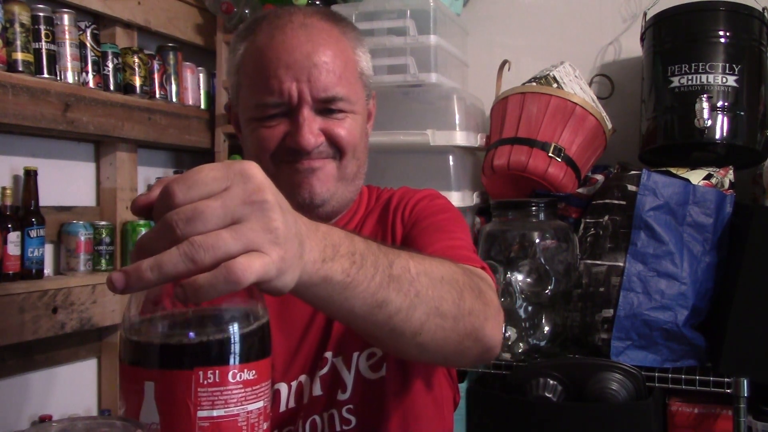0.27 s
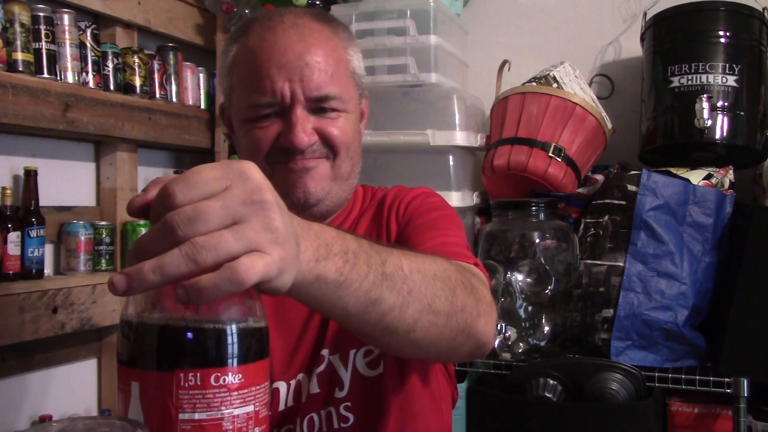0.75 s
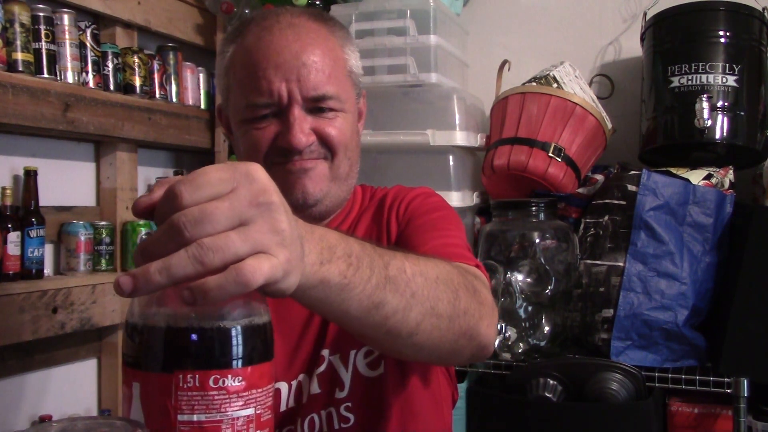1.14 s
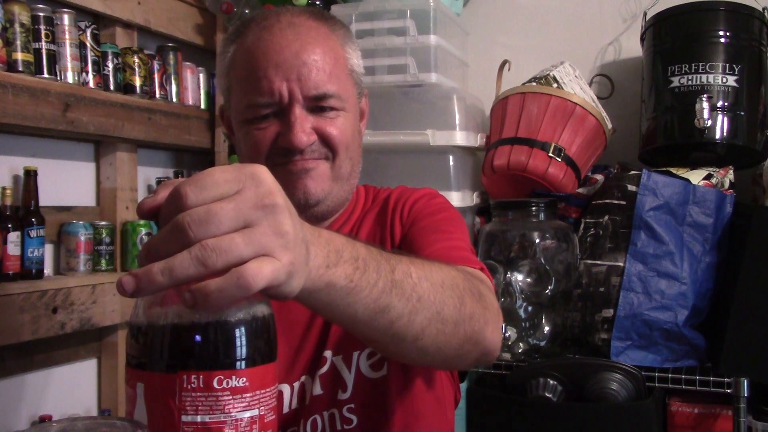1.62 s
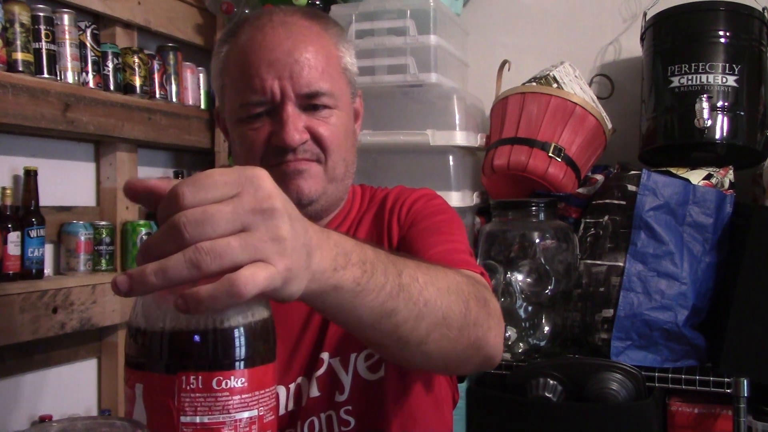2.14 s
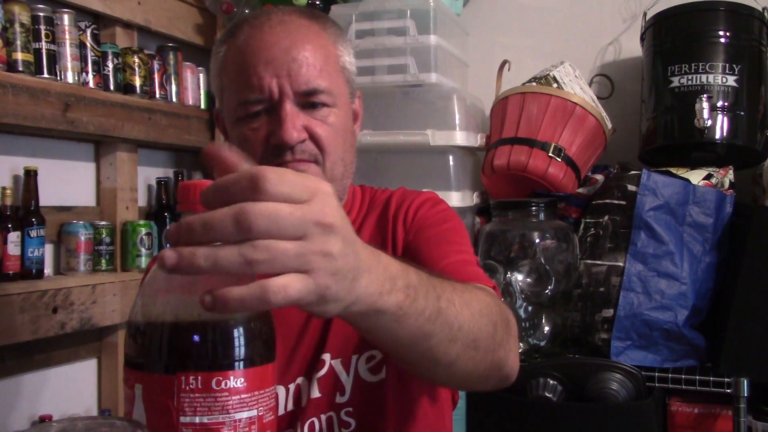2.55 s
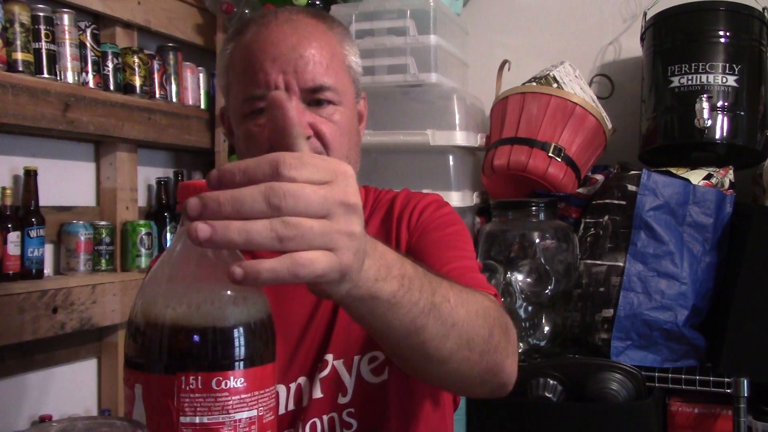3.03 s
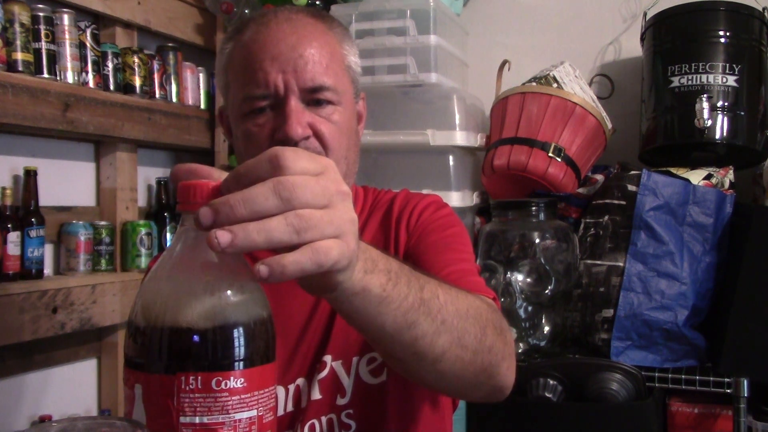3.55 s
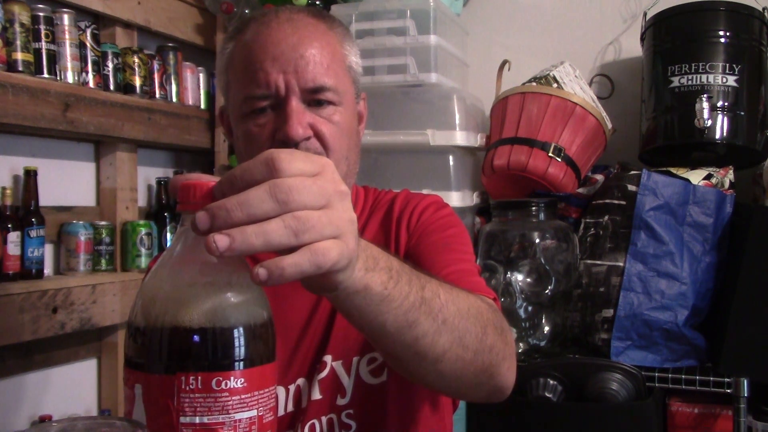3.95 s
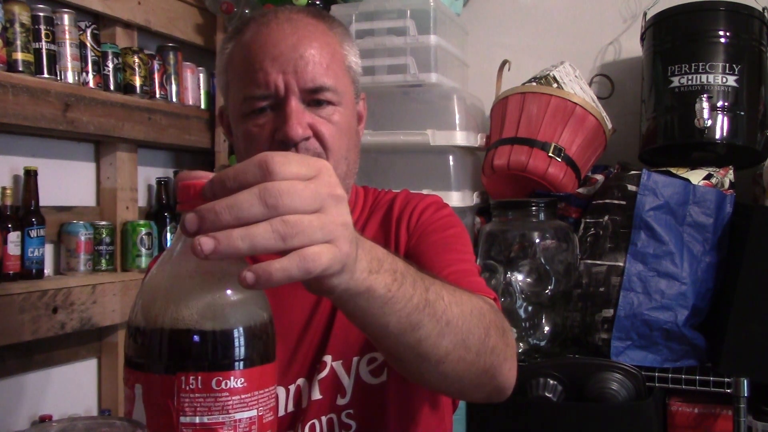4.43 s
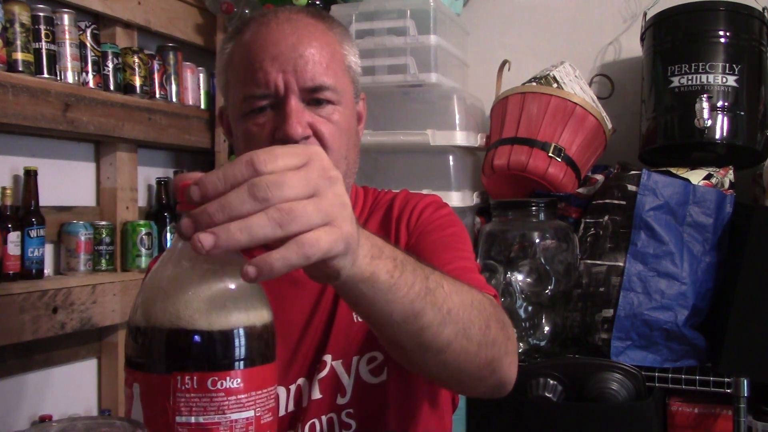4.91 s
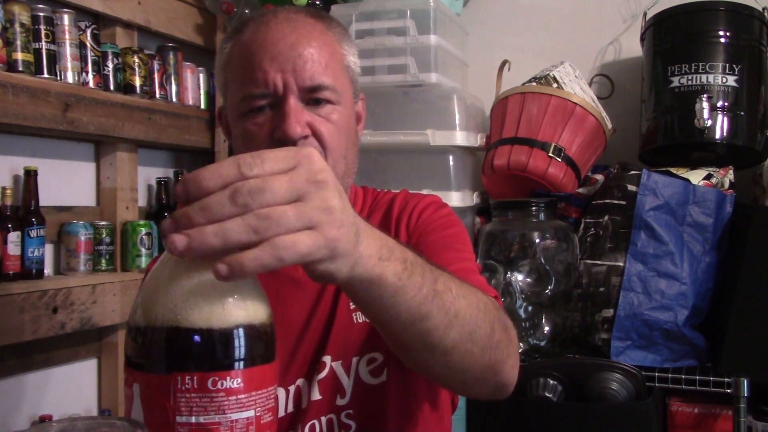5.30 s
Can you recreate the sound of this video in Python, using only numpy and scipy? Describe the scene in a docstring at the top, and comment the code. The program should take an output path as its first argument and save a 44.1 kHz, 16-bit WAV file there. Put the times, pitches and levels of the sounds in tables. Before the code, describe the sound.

Gas hisses through the screw cap of a shaken plastic soda bottle from the start, heard close up in a small, quiet room. The bright, slightly whistling jet swells, is loudest with a slight roar around 0.8 seconds, then dulls and dies away by 1.8 seconds. Fingers rub faintly on the cap, which ticks twice near 1.9 seconds. At about 2.2 seconds a small spurt begins a much quieter, wet fizz as foam reaches the cap, with a faint flex of plastic near 2.7 seconds. From 3 seconds the fizz crackles with tiny bubble pops and a thin, high whistling edge, then weakens to a trace by 4.5 seconds. Around 5.1 seconds the cap clicks and the bottle wall gives a soft snap and thud. A last short spurt of gas escapes at 5.3 to 5.4 seconds, followed by a faint, dull rustle of arm movement.

```python
"""Gas jets through the thread of a shaken plastic soda bottle as its screw cap is eased open.
The jet sounds the hollow under the hand; as the pressure falls, foam rises and the leak thins to a
wet fizz. Bubbles pop, the cap ticks, the wall flexes, and a last spurt escapes as the grip shifts.
Heard close up in a small store room."""
import sys
import numpy as np
from scipy import signal
from scipy.fft import rfft, irfft
from scipy.io import wavfile

SR = 44100
rng = np.random.default_rng(int(sys.argv[2]) if len(sys.argv) > 2 else 0)


def waveform_to_disk(signal):
    """Save audio, clipped to [-1, 1], as 16-bit WAV at the path in sys.argv[1]."""
    frames = np.transpose(np.atleast_2d(signal))
    scaled = np.clip(frames, -1, 1) * 32767
    samples = np.round(scaled).astype(np.int16)
    wavfile.write(sys.argv[1], SR, samples)


N = 245548
TIME = np.arange(N) / SR
HZ = np.maximum(np.fft.rfftfreq(N, 1 / SR), 1)
CUTOFF_HZ = 15900


def from_db(db):
    """Decibels to gain."""
    return 10 ** (np.asarray(db) / 20)


def unit_rms(x):
    """Scale to unit rms."""
    return x / np.sqrt(np.mean(x ** 2) + 1e-20)


def ramp(start_s, length_s):
    """Linear rise from 0 to 1."""
    return np.clip((TIME - start_s) / length_s, 0, 1)


def during(curve, fade_s):
    """Gate: 1 within a curve's span, exponential fade outside."""
    outside_s = np.maximum(curve[0][0] - TIME, TIME - curve[-1][0])
    return np.exp(-np.maximum(0, outside_s) / fade_s)


def colour(points):
    """Gain per frequency, interpolated in dB over log f."""
    hz, db = np.transpose(points)
    return from_db(np.interp(np.log(HZ), np.log(hz), db))


def resonances(modes):
    """Gain per frequency of steep-sided peaks, summed in power."""
    peaks = (from_db(db) / (1 + ((HZ - hz) / width) ** 2) ** 2 for hz, width, db in modes)
    return np.sqrt(sum(peak ** 2 for peak in peaks))


def through(x, gain):
    """Filter by a gain per frequency."""
    return irfft(rfft(x) * gain, N)


def bandpass(x, low_hz, high_hz):
    """Butterworth band-pass."""
    return signal.sosfilt(signal.butter(2, [low_hz, high_hz], "band", fs=SR, output="sos"), x)


def treble(x, gain_db, split_hz):
    """High shelf."""
    top = through(x, 1 / (1 + (split_hz / HZ) ** 10))
    return x + top * (from_db(gain_db) - 1)


def noise(gain):
    """Coloured noise, unit rms."""
    return unit_rms(through(rng.standard_normal(N), gain))


def flutter(rate_hz, depth_db):
    """Randomly wavering gain."""
    return from_db(depth_db * noise(1 / (1 + (HZ / rate_hz) ** 2)))


def grains(gain, per_s, spread_db=0):
    """Coloured random impulses, unit rms."""
    sizes = from_db(spread_db * np.minimum(rng.exponential(1, N), 4))
    signs = rng.choice([-1, 1], N)
    hits = rng.random(N) < per_s / SR
    return unit_rms(through(sizes * signs * hits, gain))


def rustle(gestures, spectrum, per_s, rough_db):
    """Rough grains that swell and fade with each gesture."""
    swells = (from_db(db - 20 * np.maximum((s - TIME) / rise_s, (TIME - s) / fall_s))
              for s, db, rise_s, fall_s in gestures)
    envelope = np.sqrt(sum(swell ** 2 for swell in swells))
    return envelope * grains(colour(spectrum), per_s) * flutter(rate_hz=110, depth_db=rough_db)


def place(x, start_s):
    """Put a sound on the timeline."""
    return np.pad(x, (int(start_s * SR), N))[:N]


def ring(start_s, db, hz, t60_s, glide_per_s=0):
    """Damped sine with a linear pitch glide."""
    age = np.arange(SR // 8) / SR
    phase = 2 * np.pi * hz * age * (1 + glide_per_s * age / 2)
    return place(from_db(db - 60 * age / t60_s) * np.sin(phase), start_s)


def diffuse(x, t60_s=0.08):
    """Convolve with decaying noise, unit gain."""
    age = np.arange(SR // 3) / SR
    response = rng.standard_normal(len(age)) * from_db(-60 * age / t60_s) * (age > .003)
    return signal.fftconvolve(x, response / np.linalg.norm(response))[:N]


# room noise spectrum: f/Hz, relative level/dB
ROOM_SPECTRUM = [(25, -31.5), (60, -7.5), (110, -5), (160, 2), (280, 2), (450, -2), (700, -6), (1000, -2),
                 (1150, -9.5), (1320, -1), (1600, -7.5), (3000, -14), (8000, -19.5), (15800, -37.5)]
# its stereo width: f/Hz, side re mid/dB
ROOM_SIDE = [(60, -3.5), (250, -6), (600, -4.5), (1200, -12.5), (8000, -11)]

def room_noise(level_db=-56.5):
    """Low steady noise of the room, as mid and side."""
    mid = noise(colour(ROOM_SPECTRUM))
    side = through(noise(colour(ROOM_SPECTRUM)), colour(ROOM_SIDE))
    return from_db(level_db) * np.array([mid, side])


# early reflections: delay/s, gain
ECHOES = [(.00102, .07), (.001406, .08), (.003855, -.07), (.004807, .04), (.00551, .06)]

def reflections(x, tail_db=-10):
    """Early returns off hand, bottle and shelves, plus a dense room tail."""
    early = sum(gain * np.interp(TIME - delay_s, TIME, x, left=0) for delay_s, gain in ECHOES)
    return early + from_db(tail_db) * diffuse(x)


# faint decorrelated side signal, mostly treble: f/Hz, side gain/dB
SIDE_SPECTRUM = [(1200, -44.5), (2800, -60), (3900, -17), (8000, -18), (12000, -15), (15000, -22.5)]

def stereo_width(x):
    """A faint decorrelated side signal, mostly in the treble."""
    return through(diffuse(x), colour(SIDE_SPECTRUM))


# arm movement: peak t/s, level/dB, 20 dB rise/s, 20 dB fall/s
ARM_MOVES = [(5.525, -56.5, 0.12, 0.092)]
# its spectrum: f/Hz, relative level/dB
ARM_SPECTRUM = [(40, -33.5), (120, -8), (450, 7.5), (850, 2), (1500, -11), (3000, -28), (14000, -36)]

def arm_shift():
    """The arm shifts with a dull rustle."""
    return rustle(ARM_MOVES, ARM_SPECTRUM, per_s=2500, rough_db=3.5)


# rubs on the cap: peak t/s, level/dB, 20 dB rise/s, 20 dB fall/s
RUBS = [(1.57, -48.5, .3, 0.44), (2.29, -56, 0.19, .3), (2.45, -53.5, .15, 0.23),
        (2.675, -47.5, 0.083, 0.076)]
# their spectrum: f/Hz, relative level/dB
RUB_SPECTRUM = [(600, -20), (850, -2), (1300, -2.5), (1550, -7.5), (2100, -3), (2800, -12), (5000, -14),
                (14000, -33)]

def cap_rubs():
    """Gas and fingers brush over the cap."""
    return rustle(RUBS, RUB_SPECTRUM, per_s=1900, rough_db=2.5)


# wall flexes, levels before filtering: t/s, snap/dB, thud/dB, thud f/Hz
FLEXES = [(2.201, -57.5, -40.5, 275), (2.667, -47, -62, 300), (5.2122, -38, -46, 196)]
# wall modes: f/Hz, level re snap/dB, t60/s
WALL_MODES = [(1100, -5, .022), (1360, -7, 0.017), (1990, 7.5, 0.0053), (2390, -3, 0.0078),
              (3240, -5, 0.011)]

def wall_flexes(thud_t60_s=0.073, thud_delay_s=0.0042):
    """The wall snaps under the fingers, then the full bottle thuds; a small body radiates little bass."""
    snaps = sum(ring(s, snap_db + db, hz, t60_s)
                for s, snap_db, _, _ in FLEXES for hz, db, t60_s in WALL_MODES)
    thuds = sum(ring(s + thud_delay_s, db, hz, thud_t60_s) for s, _, db, hz in FLEXES)
    return bandpass(snaps, 700, 4500) + bandpass(thuds, 130, 500)


# plastic ticks: t/s, peak level/dB, nominal band centre f/Hz
TICKS = [(1.8808, -28, 8500), (1.9192, -32, 14500), (5.108, -34.5, 5500), (5.111, -36, 7000),
         (5.1192, -34, 12000)]

def cap_ticks(crack_t60_s=.003, tail_db=-19, tail_t60_s=0.1):
    """The cap slips on its thread: a sharp crack and a short bright tail."""
    out = np.zeros(N)
    age = np.arange(SR // 10) / SR
    envelope = from_db(-60 * age / crack_t60_s) + from_db(tail_db - 60 * age / tail_t60_s)
    for s, db, hz in TICKS:
        burst = rng.standard_normal(len(age)) * envelope
        burst = bandpass(burst, hz / 2, min(hz * 1.5, CUTOFF_HZ))
        out += place(from_db(db) * burst / np.abs(burst).max(), s)
    return out


# largest bubbles: t/s, level before boost/dB
LARGE_POPS = [(3.3822, -46), (3.6431, -44), (3.7449, -50), (3.8247, -49), (4.0632, -49), (4.6433, -45),
              (4.8249, -51), (4.8628, -48), (5.0833, -44)]

def bubble_pops(neck_hz=2070, t60_s=0.012, glide_per_s=25, boost_db=2, small_count=46):
    """Bubbles ring in the neck, rising in pitch as they open; small ones burst at random."""
    out = sum(ring(s, db + boost_db, neck_hz, t60_s, glide_per_s) for s, db in LARGE_POPS)
    for _ in range(small_count):
        start_s = rng.uniform(2.9, 5.2)
        db = rng.uniform(-54, -48)
        octaves = rng.uniform(-.33, .27)
        out += ring(start_s, db, neck_hz * 2 ** octaves, t60_s, glide_per_s)
    return out


# spurts: peak t/s, level/dB, 20 dB rise/s, 20 dB fall/s
SPURTS = [(2.31, -47, .2, 0.36), (5.29, -48, 0.039, 0.095), (5.39, -45.5, 0.16, 0.069)]
# their spectrum: f/Hz, relative level/dB
SPURT_SPECTRUM = [(300, -25), (2000, -11), (3500, -14.5), (3900, -1), (4600, -4), (5200, 1.5), (6100, -9),
                  (8500, -19), (10500, -17), (15000, -40)]

def gas_spurts():
    """Gas spurts through the wet thread as the grip shifts."""
    return rustle(SPURTS, SPURT_SPECTRUM, per_s=6600, rough_db=2.5)


# leak through the wet thread: t/s, level/dB
LEAK_LEVEL = [(2.22, -46), (2.35, -45), (3.0, -44), (3.5, -45), (4.3, -50.5), (4.52, -56.3), (5.12, -57.5)]
# wet gap resonances: f/Hz, width/Hz, relative level/dB
GAP_MODES = [(5100, 800, 0.5), (6150, 340, -5), (7520, 480, -2), (8040, 470, 0)]
# narrow gaps whistling in turn: peak t/s, spread/s, f/Hz, width/Hz, level re leak/dB
WHISTLES = [(3.1, .65, 12450, 900, -11.5), (3.95, 0.56, 9520, 805, -5.5)]
# spray of tiny bursting films: f/Hz, relative level/dB
SPRAY_SPECTRUM = [(1500, -22.5), (3100, -6), (4200, -0.5), (5700, 1.5), (6700, 2), (7400, 3.5),
                  (8700, -0.5), (9400, 0.5), (10800, 0), (11500, 0.5), (12450, -4), (13600, -9.5),
                  (15800, -15)]

def foam_fizz(spray_db=-3, spray_loss_db=8, brush_db=-17):
    """Foam fills the thread: the leak crackles, sings in the wet gaps and whistles in the narrowest."""
    leak_db = np.interp(TIME, *np.transpose(LEAK_LEVEL))
    wet = ramp(start_s=2.21, length_s=0.39)
    gaps_db = -16 * (1 - wet) - 3.2 * wet
    gas = from_db(gaps_db) * noise(resonances(GAP_MODES))
    whistle_power = 0
    for peak_s, spread_s, hz, width_hz, db in WHISTLES:
        gain = from_db(db) * np.exp(-((TIME - peak_s) / spread_s) ** 2 / 2)
        gas += gain * noise(resonances([(hz, width_hz, 0)]))
        whistle_power += gain ** 2
    bright_db = -6 * (1 - wet) + 3 * wet + 0.3 * (leak_db - leak_db.max())
    spray = grains(colour(SPRAY_SPECTRUM), per_s=14000, spread_db=0.5)
    spray = treble(spray, bright_db, split_hz=11000)
    gas += from_db(spray_db - spray_loss_db * whistle_power) * spray
    gas += from_db(brush_db) * noise(colour(RUB_SPECTRUM))   # the leak brushes the cap
    gas *= flutter(rate_hz=36, depth_db=0.57)
    return from_db(leak_db) * gas * during(LEAK_LEVEL, fade_s=0.079)


# hollow before the hand closes in: f/Hz, width/Hz, relative level/dB
HOLLOW_MODES = [(2049, 260, 1.5), (2188, 190, 1.5)]

def hand_hollow(pitch_drop=.033):
    """The hollow under the hand resonates, dropping in pitch as the hand cups the cap more closely."""
    cupped = ramp(start_s=1.35, length_s=.2)
    slowed_s = np.cumsum(1 - pitch_drop * cupped) / SR
    hollow = np.interp(slowed_s, TIME, noise(resonances(HOLLOW_MODES)))
    return hollow * flutter(rate_hz=7.3, depth_db=.5)


# flow through the dry thread: t/s, relative level/dB
JET_FLOW = [(0, -28), (.09, -25), (.33, -21.5), (.52, -15), (.85, -14), (1.12, -17), (1.44, -22.5),
            (1.77, -39.5), (1.97, -47), (2.1, -47), (2.18, -43.5)]
# hiss spectrum: f/Hz, relative level/dB
HISS_SPECTRUM = [(1400, -43), (2100, -14), (2900, -12), (3450, -4.5), (3950, -2), (5500, -2.5),
                 (6200, -1.5), (7400, 0.5), (9300, -3), (11300, -2), (13000, -9), (14100, -7.5),
                 (15800, -15.5)]
# edge tones of the thread: f/Hz, width/Hz, relative level/dB
EDGE_TONES = [(3955, 80, -1), (4225, 50, -2), (4532, 45, -2), (4737, 60, -1), (4965, 55, 1), (5822, 70, .5),
              (6574, 40, 5.5), (6705, 50, 0), (6865, 55, 1.5), (7065, 45, 0), (7306, 45, -1), (7690, 80, 1),
              (8942, 40, 0), (9072, 45, 0), (9463, 50, -2), (10788, 90, -2), (13700, 90, -8),
              (14700, 150, -8)]
# roar spectrum: f/Hz, relative level/dB
ROAR_SPECTRUM = [(60, -37), (250, -7), (700, -6), (1020, 5.5), (1300, 3.5), (1700, 5.5), (2900, 4),
                 (4500, -35)]

def gas_jet(tones_db=-9, tight_body_db=-1.5, tight_roar_db=-8, dulling_db_per_s=3.5):
    """Gas tears through the thread; only a strong jet roars, and it dulls as flow and pressure fall."""
    flow_db = np.interp(TIME, *np.transpose(JET_FLOW))
    flow_db -= flow_db.max()
    tight = 1 - ramp(start_s=0.31, length_s=.45)   # the cap is eased further open
    body_db = tight_body_db * tight
    bright_db = 4.5 + 0.43 * flow_db - dulling_db_per_s * TIME
    hiss = noise(colour(HISS_SPECTRUM)) + from_db(tones_db) * noise(resonances(EDGE_TONES))
    hiss = from_db(body_db) * treble(hiss, -body_db, split_hz=4800)   # a tight cap thins the low hiss
    hiss = treble(hiss, bright_db, split_hz=10000)
    gas = from_db(-13.5 + .98 * flow_db) * hiss
    gas += from_db(-28.5 + .73 * flow_db) * hand_hollow()
    gas += from_db(-31.5 + 1.34 * flow_db + tight_roar_db * tight) * noise(colour(ROAR_SPECTRUM))
    return gas * flutter(rate_hz=28, depth_db=0.06) * during(JET_FLOW, fade_s=0.064)


# stereo balance: f/Hz, left re right/dB
BALANCE = [(2400, 0), (4400, .5), (8000, 1.1), (15000, .7)]

def scene():
    """The bottle and its reflections, nearly centred, over the room noise."""
    direct = gas_jet() + foam_fizz() + cap_ticks() + bubble_pops() + wall_flexes()
    direct += gas_spurts() + cap_rubs() + arm_shift()
    bottle = np.array([direct + reflections(direct), stereo_width(direct)])
    mid, side = bottle + room_noise()
    lean = np.sqrt(colour(BALANCE))
    return np.array([through(mid + side, lean), through(mid - side, 1 / lean)])


def record(dry):
    """Full-scale clip, then a steep low-pass."""
    lowpass = signal.ellip(12, .1, 90, CUTOFF_HZ, fs=SR, output="sos")
    return signal.sosfilt(lowpass, np.clip(dry, -1, 1))


dry = scene()
out = record(dry)
waveform_to_disk(out)
```